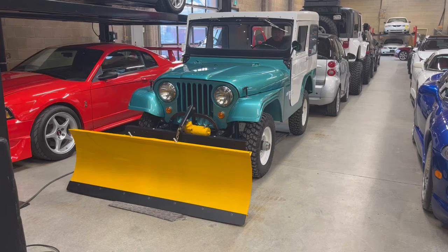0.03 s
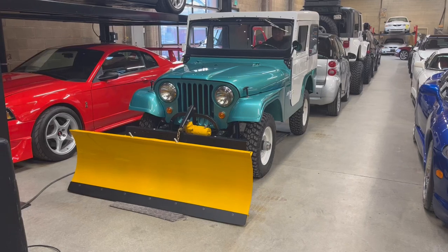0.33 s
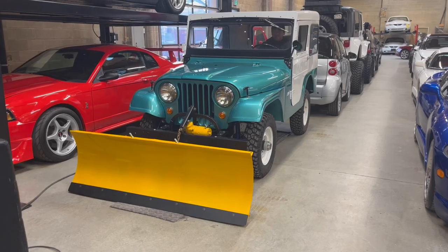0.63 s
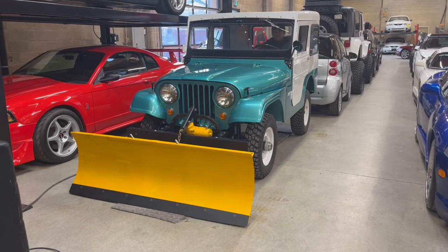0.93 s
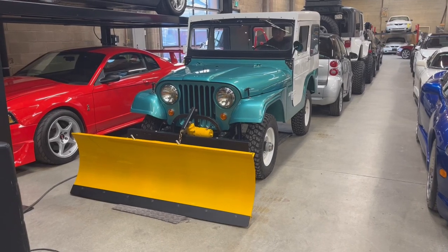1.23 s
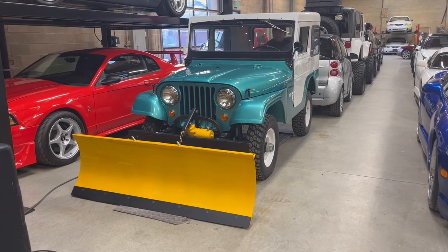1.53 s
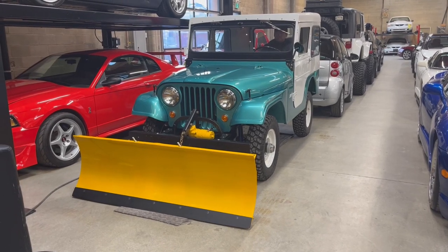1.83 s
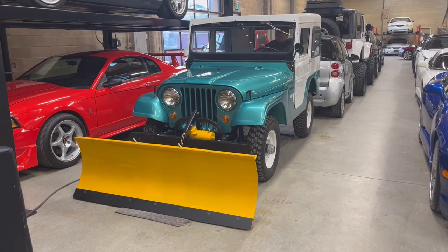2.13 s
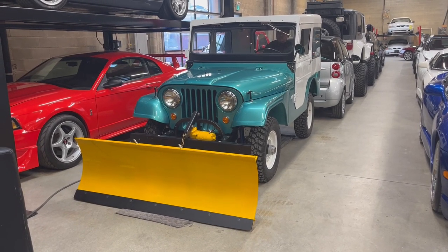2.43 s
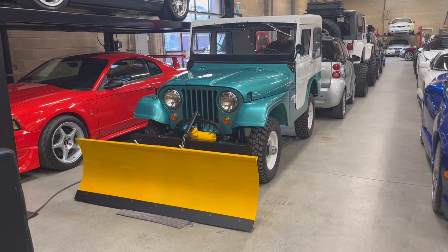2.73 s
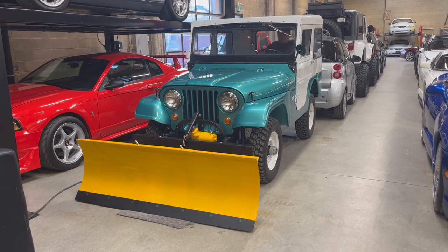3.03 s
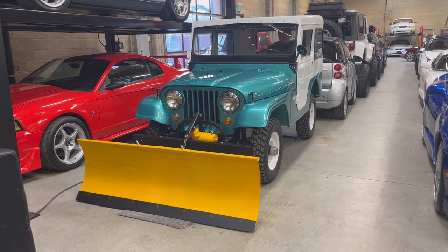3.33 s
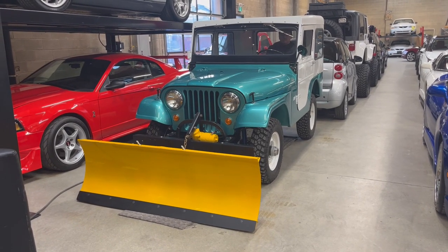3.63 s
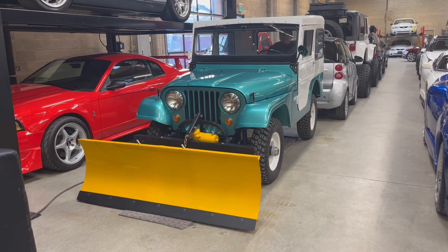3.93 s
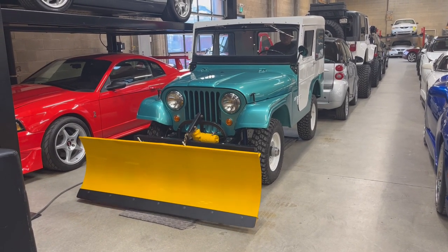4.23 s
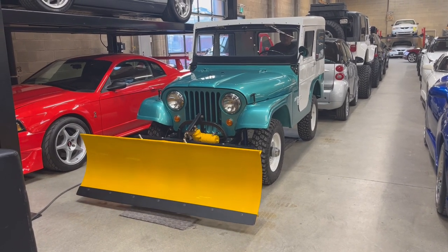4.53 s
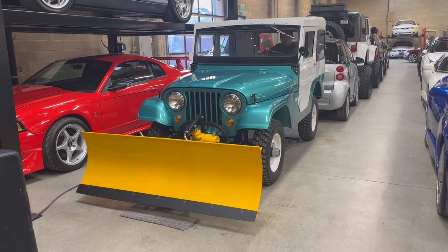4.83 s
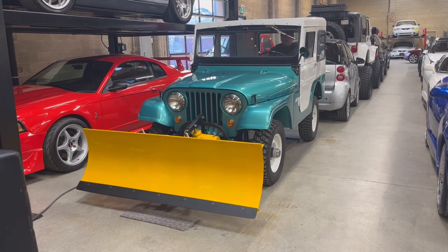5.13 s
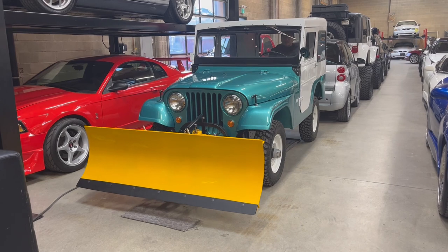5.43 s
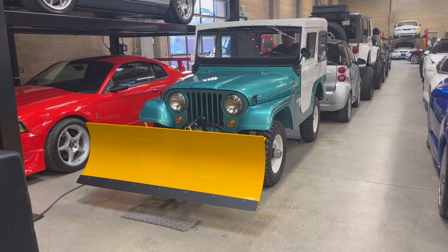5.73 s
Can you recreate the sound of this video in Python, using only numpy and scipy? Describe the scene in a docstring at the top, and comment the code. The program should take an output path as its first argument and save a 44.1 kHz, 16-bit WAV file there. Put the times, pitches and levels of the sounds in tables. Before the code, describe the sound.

A starter grinds and an engine settles to a lumpy idle; after a clack, an electric pump whirs, groans and clinks, raising a plow.

```python
"""A large garage hall, with a phone's two microphone ports a few metres from an old off-roader.
After a few soft knocks a solenoid clacks, the starter grinds on the flywheel and the four-cylinder
engine catches. Its uneven firings ring the exhaust pipe as it settles to a lumpy idle.
A second clack starts the electric hydraulic pump, which whirs and slowly sags as it lifts the snow
plow blade: oil churns, the motor brushes hiss and squeal, the lift groans and ticks, its chain clinks."""
import sys
import numpy as np
from scipy import signal
from scipy.fft import rfft, irfft
from scipy.io import wavfile
from scipy.ndimage import uniform_filter1d

SR = 44100
rng = np.random.default_rng(int(sys.argv[2]) if len(sys.argv) > 2 else 0)


def file_out(sig):
    """Save sig as 16-bit WAV at sys.argv[1]."""
    # one column per channel
    cols = np.atleast_2d(sig).T
    # limit, then scale
    lim = np.clip(cols, -1, 1)
    pcm = np.round(lim * 32767).astype(np.int16)
    wavfile.write(sys.argv[1], SR, pcm)


N = 264600
T = np.arange(N) / SR
HZ = np.fft.rfftfreq(N, 1 / SR)
QUADRATURE = np.array([[0], [np.pi / 2]])  # direct and diffuse rows, a quarter cycle apart


def amp(db):
    """Decibels as a gain."""
    return 10 ** (np.asarray(db) / 20)


def unit_rms(x):
    """Scales to an rms of 1."""
    return x / np.sqrt(np.mean(x ** 2) + 1e-20)


def curve(rows):
    """Follows rows of (t/s, value) through time."""
    return np.interp(T, *np.transpose(rows))


def at_hz(rows, hz):
    """Reads rows of (f/Hz, value) along a log frequency axis."""
    f, value = np.transpose(rows)
    return np.interp(np.log(hz + 1), np.log(f + 1), value)


def rise(start, length):
    """Goes from 0 to 1 in a straight line."""
    return np.clip((T - start) / length, 0, 1)


def settle(start, length):
    """Stays at 1 until start, then dies away."""
    return np.exp(-np.maximum(T - start, 0) / length)


def held(start, attack, end, t60):
    """Attack, hold and release."""
    return rise(start, attack) * amp(-60 * np.maximum(T - end, 0) / t60)


def noise():
    """White noise in two rows, direct and diffuse."""
    return rng.standard_normal((2, N))


def wander(rate):
    """A smooth random drift of rms 1 through rate values a second."""
    knots = rng.standard_normal(4096)
    return np.interp(T * rate * 8, np.arange(32768), signal.resample(knots, 32768))


def coloured(x, colour):
    """Filters by a spectrum; white noise keeps its power."""
    return irfft(rfft(x) * unit_rms(amp(at_hz(colour, HZ))), N)


def panels(x, ripple_db, spacing_hz):
    """Many close resonances of sheet metal and casings ripple the spectrum."""
    ripple = np.interp(HZ / spacing_hz, np.arange(2048), rng.standard_normal(2048))
    return irfft(rfft(x) * unit_rms(amp(ripple_db * ripple * np.clip(HZ / 2000, 0, 1))), N)


def hits(rows, colour):
    """Short, dense rings of struck parts, from rows of (t/s, level/dB, t60/s)."""
    envelope = sum(amp(db - 60 * np.maximum(T - s, 0) / t60) * (T >= s) for s, db, t60 in rows)
    return coloured(noise() * envelope, colour)


# Spectrum of the hall's rumble: f/Hz, level/dB
ROOM_COLOUR = [(15, -20), (30, -32), (55, 7), (120, -4.5), (200, -9.5), (400, -19.5), (800, -25),
               (1600, -27), (3000, -40.5), (6000, -53), (12000, -73)]
def room_tone(db):
    """The low rumble of the hall, all around the microphone."""
    return amp(db) * coloured(noise(), ROOM_COLOUR)


# Knocks at the controls: t/s, level/dB
KNOCKS = [(0.333, -47.5), (0.423, -45), (0.465, -42)]
# Their spectrum: f/Hz, level/dB
KNOCK_COLOUR = [(60, -6), (200, 7), (500, -3), (1500, -15), (2500, -30), (5000, -32), (12000, -55)]
def control_knocks(t60=0.07):
    """Soft, dull knocks as the controls are handled."""
    return hits([(s, db, t60) for s, db in KNOCKS], KNOCK_COLOUR)


# Clacks of the starter's solenoid, then the pump's: t/s, level/dB, t60/s
CLACKS = [(0.585, -45, 0.65), (3.81, -19, 0.13)]
# Their spectrum: f/Hz, level/dB
CLACK_COLOUR = [(200, 18.5), (900, 11), (2000, 15), (4000, 6.5), (5300, 6), (6150, 5), (7000, 7.5),
                (11000, 4.5), (15000, -4)]
def solenoids():
    """Each solenoid snaps shut with a bright clack."""
    return hits(CLACKS, CLACK_COLOUR)


# Spectrum of the grinding pinion: f/Hz, level/dB
GRIND_COLOUR = [(20, -12), (55, 3), (120, -0.5), (300, -8.5), (550, 0), (1300, -5.5), (2500, -14),
                (4000, -18), (6000, -31), (10000, -44), (14000, -54)]
# Rasps of the pinion: start t/s, attack/s, end t/s, t60/s, level/dB
RASPS = [(0.61, 0.013, 0.633, 0.15, -36), (0.744, 0.039, 0.8, 0.68, -33.5)]
# Their spectrum: f/Hz, level/dB
RASP_COLOUR = [(300, -27), (1400, 6), (1950, -4), (2350, 0), (2600, 3), (2950, -8), (3300, 2), (3900, -0.5),
               (4450, -6.5), (6000, -13), (10000, -17), (14000, -23)]
def starter(teeth_per_s=280, tooth_db=9, grain_db=1.5):
    """The pinion grinds tooth by tooth on the flywheel, rasping as it meshes and as it is overrun."""
    grinding = amp(-30.5) * held(start=0.6064, attack=0.028, end=0.855, t60=0.41)
    rasping = sum(amp(db) * held(*shape) for *shape, db in RASPS)
    teeth = unit_rms(amp(-tooth_db * (teeth_per_s * T % 1) + grain_db * wander(rate=150)))
    grind = grinding * coloured(noise() * teeth, GRIND_COLOUR)
    return grind + rasping * coloured(noise() * teeth, RASP_COLOUR)


# Thuds of cranking: t/s, level/dB
THUDS = [(0.643, -27), (0.674, -28), (0.852, -36)]
# Their spectrum: f/Hz, level/dB
THUD_COLOUR = [(30, -12), (70, 1), (140, 2), (300, -16), (800, -40), (4000, -80)]
def cranking_thuds(t60=0.14):
    """The engine thuds as the starter turns it over."""
    return hits([(s, db, t60) for s, db in THUDS], THUD_COLOUR)


def whine(start, length, first_hz, last_hz, db, waver):
    """An unsteady tone that glides up as it swells and fades."""
    along = rise(start, length)
    hz = (first_hz + (last_hz - first_hz) * along) * (1 + waver * wander(rate=120))
    return amp(db) * np.sin(np.pi * along) * np.sin(2 * np.pi * np.cumsum(hz) / SR + QUADRATURE)


# Whines of the start: t/s, length/s, first f/Hz, last f/Hz, level/dB, waver/fraction of pitch
START_WHINES = [(0.694, 0.093, 538, 611, -28.5, .016), (0.744, 0.089, 800, 864, -33, 0.05),
                (0.75, 0.15, 2500, 2746, -36, .028), (0.911, 0.21, 1820, 1955, -41, 0.02)]
def start_whines():
    """The cranking gears, the overrun pinion and the belt whine briefly."""
    return sum(whine(*row) for row in START_WHINES)


CATCH_S, CATCH_RISE_S = 0.862, 0.049  # the engine catches
# Spectrum of fan rush and valve gear: f/Hz, level/dB
CLATTER_COLOUR = [(100, -2), (250, -1.5), (330, -6), (420, -6.5), (500, -3), (700, -5.5), (950, -10),
                  (1350, -6.5), (1680, -11.5), (2150, -15.5), (2550, -13.5), (3000, -17.5), (3400, -16.5),
                  (3900, -18.5), (4350, -18.5), (4800, -19), (5400, -20), (5900, -24), (6600, -19),
                  (7500, -23), (10000, -24.5), (13500, -36.5)]
# Swells of the engine's treble: t/s, level/dB
IDLE_TREBLE = [(0.9, 1), (1.05, 2.5), (1.17, 0), (1.3, 1.5), (1.45, -1.5), (2.0, -0.5), (2.25, 0.5),
               (2.72, -0.8), (2.83, 3), (3.03, -0.5), (3.15, 1.5), (3.35, 0.5), (3.62, -0.7), (3.7, 2.5),
               (3.8, 0)]
def clatter(firings, tap_depth=0.19, treble_hz=3040):
    """Fan rush with a tap of the valve gear for each firing; its treble swells now and then."""
    taps = unit_rms(1 + tap_depth * np.exp(-(firings % 1) / 0.064))
    rush = panels(coloured(noise() * taps, CLATTER_COLOUR), ripple_db=3, spacing_hz=29.6)
    treble = irfft(rfft(rush) / (1 + (treble_hz / (HZ + 1)) ** 8), N)
    db = -34.5 + 3 * settle(CATCH_S, 0.33) + 0.93 * wander(rate=25)
    return rise(CATCH_S, CATCH_RISE_S) * amp(db) * (rush + treble * (amp(curve(IDLE_TREBLE)) - 1))


# Bands of belt and bearings: f/Hz, width/Hz, level/dB
WHIRR_BANDS = [(1930, 93, -56.5), (3730, 90, -54.5), (3946, 170, -54.5), (4760, 99, -60.5),
               (5010, 130, -59), (5600, 60, -61), (6070, 180, -57.5)]
def whirr(swell_db=0.5):
    """Belt and bearings sing in narrow bands of noise that swell with the engine's treble."""
    bands = np.zeros((2, N))
    for hz, width, db in WHIRR_BANDS:
        gain = amp(db + swell_db * wander(rate=6.28))
        resonance = 1 / (1 + (2 * (HZ - hz) / width) ** 2)
        bands += gain * unit_rms(irfft(rfft(noise()) * resonance, N))
    return rise(CATCH_S, CATCH_RISE_S) * amp(curve(IDLE_TREBLE)) * bands


# Strength of the four firings in a cycle: level/dB
CYLINDER_DB = [4, -4.5, 0.5, -6]
# Resonances of exhaust pipe, body and hall: f/Hz, width/Hz, level/dB
PIPE_MODES = [(42.7, 2, -4.5), (52.7, 6.7, 9), (59.7, 4.1, 6), (76.1, 6.8, -0.5), (100.9, 9.6, 0.5),
              (119.64, 11.9, -3.5), (149.8, 28, -17.5), (193.7, 16.6, -11.5), (269.6, 19, -24.5)]
def exhaust(firings, flare, uneven_db=4, gas_rush=0.025):
    """Each firing, strong or weak by cylinder and chance, rings the low modes; gas rushes between."""
    fired = np.flatnonzero(np.diff(np.floor(firings)))
    chance = rng.standard_normal(400)[:len(fired)]
    pulses = gas_rush * rng.standard_normal(N)
    pulses[fired] += amp(np.resize(CYLINDER_DB, len(fired)) + uneven_db * chance)
    t = T[:SR]
    ring = sum(amp(db) * width ** 2 * t * np.exp(-np.pi * width * t) * np.cos(2 * np.pi * hz * t)
               for hz, width, db in PIPE_MODES)
    boom = signal.fftconvolve(pulses, ring)[:N]
    running_rms = np.sqrt(abs(uniform_filter1d(boom ** 2, SR // 4)) + 1e-9)
    return amp(-25.5 + 2 * flare) * boom / running_rms


# Orders of the engine block: multiple of the firing rate, relative level/dB
BLOCK_ORDERS = [(1.25, -34), (3, -41), (5, -48)]
def block_hum(firings, flare, uneven_db=3):
    """The block hums unevenly, swelling as the engine takes hold."""
    orders = sum(amp(db + uneven_db * wander(rate=10)) * np.cos(2 * np.pi * k * firings)
                 for k, db in BLOCK_ORDERS)
    return np.sqrt(2) * amp(-2.5 + 10.5 * flare) * orders


def fan(firings, blades_per_firing=2.37):
    """The passing blades of the belt-driven fan make one low tone."""
    return np.sqrt(2) * amp(-38.5) * np.sin(2 * np.pi * blades_per_firing * firings)


# Idle speed: t/s, firing rate/Hz
IDLE_SPEED = [(1.15, 37.5), (1.28, 39.5), (1.7, 38.0), (1.9, 38.7), (2.28, 38.2), (2.42, 39.2),
              (2.58, 39.1), (2.85, 40.8), (2.99, 40.0), (3.14, 41.1), (3.33, 40.2), (3.8, 40.7)]
def engine(crank_hz=17):
    """Runs up from cranking speed to idle and fills the hall with rumble."""
    firing_hz = crank_hz + (curve(IDLE_SPEED) - crank_hz) * rise(0.72, 0.4)
    firings = np.cumsum(firing_hz) / SR
    flare = np.exp(-((T - 1.07) / 0.14) ** 2)  # one brief swell as it takes hold
    low_end = block_hum(firings, flare) + fan(firings) + room_tone(db=-36.5) + exhaust(firings, flare)
    return rise(0.88, 0.076) * low_end + clatter(firings) + whirr()


PUMP_ON_S, BITE_S, LIFT_LENGTH_S = 3.81, 3.868, 0.45  # motor on; oil taken up; the blade's travel
# Strong shaft orders: multiple (rounded), blade-down level/dB, blade-up level/dB, change begins t/s
PUMP_ORDERS = [(1, -40, -30, 4.75), (2, -33, -39, 6.2), (4, -29.5, -31.5, 4.56), (5, -25, -35.5, 4.37),
               (6, -48, -38.5, 4.4), (7, -30.5, -30.5, 4.3), (8, -29.5, -33, 5), (9, -36, -40.5, 4.1),
               (10, -44.5, -33.5, 4.44), (11, -44, -39, 4.1), (12, -29.5, -40.5, 4.87),
               (13, -31, -34.5, 4.37), (15, -26.5, -43, 5), (16, -37, -28.5, 4.78), (17, -35.5, -62, 4.83),
               (18, -27, -28, 4.9), (19, -34, -37, 4.2), (20, -31, -26, 4.1), (21, -32.5, -28, 6),
               (23, -33.5, -45, 4.65), (24, -27, -45, 4.07), (25, -33, -42, 4.64), (27, -32, -38, 4.4),
               (28, -35, -32, 4.8), (29, -27.5, -42, 4.86), (30, -38, -41, 4.8), (31, -28, -31.5, 5.1),
               (32, -33, -52, 5.4), (35, -55, -34.5, 4.7), (36, -42, -32.5, 5.3), (37, -34.5, -29, 4.8),
               (38, -41, -32, 5.8), (43, -40.5, -37.5, 4.7), (54, -67, -40, 5), (55, -54, -55, 5.2),
               (84.3, -49, -44, 4.9)]
# The weaker orders between and above them: f/Hz, level/dB
FINE_ORDERS = [(40, -57), (200, -51), (600, -42), (1100, -52), (1500, -37), (1800, -52.5), (2200, -50.5),
               (2800, -54.5), (3300, -51), (3700, -77)]
# Cut or boost as the risen blade screens the pump from the microphone: f/Hz, level/dB
BLADE_SCREEN = [(300, -1.5), (480, -3.5), (800, -6), (900, 6), (1250, -1.5), (2200, -2), (3300, 2.5)]
# The pump's three-a-turn drone: t/s, level/dB
DRONE = [(3.95, -29), (4.42, -24.5), (4.92, -20.5), (5.15, -45), (5.55, -58), (5.66, -28), (6.0, -21)]
def pump_tones(turns, shaft_hz, throb_hz=627):
    """Shaft orders of motor and gear pump over a drone, shaded or reflected by the rising blade."""
    strong = {round(k): row for k, *row in PUMP_ORDERS}
    ragged = 0.76 * settle(BITE_S, 0.33)  # the tones steady as the oil flow settles
    screened = rise(5.61, 0.29)
    orders = np.zeros((2, N))
    for k in range(1, 90):
        hz = k * shaft_hz
        if k in strong:
            down_db, up_db, start = strong[k]
            db = down_db + (up_db - down_db) * rise(start, LIFT_LENGTH_S) + 1.1 * wander(rate=6)
        else:
            db = at_hz(FINE_ORDERS, hz) + 2.5 * wander(rate=4)
        jitter = (0.12 + ragged * min(hz / 1000, 1)) * wander(rate=35)
        scatter = min(hz / throb_hz, 1) * (rng.random() - 0.5)  # low orders keep step: a throb a turn
        angle = 2 * np.pi * (k * turns + scatter) + jitter
        gain = amp(db + screened * at_hz(BLADE_SCREEN, hz))
        orders[0] -= gain * np.cos(angle)
        orders[1] += gain * np.sin(angle) * rng.choice([-1, 1])  # by way of the hall, out of step
    drone = amp(curve(DRONE)) * np.sin(2 * np.pi * 3 * turns)
    return np.sqrt(2) * amp(-1) * (orders + drone)


# Resonances of the motor brushes: f/Hz, relative level/dB
SQUEAL_MODES = [(13200, -51.5), (14053, -47), (14468, -55), (14658, -64)]
def brush_squeal(height, waver_hz=35, fitful_db=5, flutter_db=3):
    """The brushes sing in fits, now at one high resonance, now at another, less with the blade up."""
    squeal = np.zeros((2, N))
    for hz, db in SQUEAL_MODES:
        angle = 2 * np.pi * np.cumsum(hz + waver_hz * wander(rate=600)) / SR
        fits = unit_rms(amp(fitful_db * np.minimum(wander(rate=16), 1) + flutter_db * wander(rate=70)))
        diffuse = np.cos(angle) * unit_rms(np.tanh(wander(rate=11)))
        squeal += np.sqrt(2) * amp(db) * fits * np.array([np.sin(angle), diffuse])
    return squeal * amp(7 - 4.6 * height)


# Spectrum of the churning oil: f/Hz, level/dB
CHURN_COLOUR = [(60, 5), (175, 2), (280, 1.5), (420, -7), (510, -4.5), (620, 1), (780, 4.5), (950, -0.5),
                (1150, -1.5), (1500, -1.5), (2000, -10.5), (4000, -19), (8000, -57)]
def oil_churn(turns, height):
    """Oil churns in the pump, hardest at first, with a slight surge at each turn."""
    surge = unit_rms(1 + 0.057 * np.cos(2 * np.pi * turns))
    db = -27.5 + 6 * settle(BITE_S, 0.76) - 0.5 * height
    return amp(db) * coloured(noise() * surge, CHURN_COLOUR)


# Spectrum of the brushes' hiss: f/Hz, level/dB
HISS_COLOUR = [(800, -1), (2000, 1.5), (2400, 2), (2950, -2), (3300, 2.5), (3550, -2.5), (3850, 2.5),
               (4400, -4), (4900, -1), (5800, -2.5), (6350, -1.5), (7400, -0.5), (8300, -25), (10500, -5.5),
               (13000, -26), (15000, -19)]
# Spectrum of their sparks: f/Hz, level/dB
SPARK_COLOUR = [(3000, -12), (7000, -47), (9500, 9.5), (10700, 0), (12700, -9.5), (15000, -4.5)]
def brush_buzz(turns, height, bars=13, hiss_fall_db=2, spark_fall_db=10):
    """The brushes buzz over the commutator bars, hissing and sparking afresh at each turn."""
    contact = (1 + 0.16 * np.cos(2 * np.pi * bars * turns)) * amp(1.4 * wander(rate=98))
    rubbing = unit_rms(contact * amp(-hiss_fall_db * (turns % 1)))
    sparking = contact * amp(spark_fall_db * (0.5 - turns % 1))
    hiss = panels(coloured(noise() * rubbing, HISS_COLOUR), ripple_db=3.5, spacing_hz=36.13)
    sparks = panels(coloured(noise() * sparking, SPARK_COLOUR), ripple_db=-3.5, spacing_hz=112)
    return amp(-32) * hiss + amp(-40 - 3.5 * height) * sparks


# Ticks of the lift gear taking the load: t/s, click level/dB, ring level/dB
TICKS = [(3.9, -35, -24.5), (4, -26, -28.5), (4.103, -28, -31), (4.238, -28, -30), (4.401, -27, -37),
         (4.487, -45, -41), (4.5, -29, -33), (4.565, -28.5, -34), (4.619, -30, -38), (4.651, -29, -33),
         (4.769, -33, -39), (4.802, -24, -43), (5.056, -28, -39)]
# Modes of the lift gear: f/Hz, level/dB, t60/s
GEAR_MODES = [(2693, -1.5, 0.33), (3365, 2, 0.13), (5560, -4, 0.11), (6110, -3.5, 0.092), (6120, -4, 0.13),
              (6400, -7, 0.08), (6520, -11, .08), (7130, -14, .08)]
def gear_chatter(turns, height, uneven_db=4):
    """The ticks, and loose parts knocking at each turn of the pump, ring the metal of the lift gear."""
    each_turn = np.diff(np.floor(turns), prepend=0)
    knock_db = -42.5 - 4.5 * height + uneven_db * np.clip(rng.standard_normal(N), -2, 1)
    knocks = each_turn * amp(knock_db) * rng.choice([-1, 1], N)
    for s, _, ring_db in TICKS:
        knocks[round(s * SR)] += amp(ring_db)
    t = T[:SR // 4]
    ring = sum(amp(db - 60 * t / t60) * np.sin(2 * np.pi * (hz * t + rng.random()) + QUADRATURE)
               for hz, db, t60 in GEAR_MODES)
    return signal.fftconvolve(knocks[None], ring, axes=1)[:, :N]


# Groans of the lift: t/s, length/s, first f/Hz, last f/Hz, level/dB
GROANS = [(3.884, 0.2, 1058, 1200, -19.5), (4.04, 0.23, 712, 726, -22), (4.187, 0.16, 743, 803, -30),
          (4.695, 0.26, 778, 815, -24)]
def lift_groans():
    """The straining lift groans in short, rough, gliding tones."""
    return sum(whine(*row, waver=0.0202) for row in GROANS)


# Pump speed, gathering and then sagging under load: t/s, shaft rate/Hz
PUMP_SPEED = [(3.88, 36.5), (3.95, 38.7), (4.03, 39.9), (4.15, 40.27), (4.53, 39.95), (5.2, 39.65),
              (5.7, 39.43), (6.0, 39.15)]
def pump(spin_up_s=0.018, free_db=-4.5):
    """The motor spins up freely, bites into the oil and lifts the blade."""
    speed = curve(PUMP_SPEED) * (1 - settle(PUMP_ON_S, spin_up_s)) * (1 + 0.00077 * wander(rate=18))
    turns = np.cumsum(speed) / SR
    effort = rise(PUMP_ON_S, BITE_S - PUMP_ON_S) * amp(free_db * (1 - rise(BITE_S, 0.0084)))
    height = rise(5.03, LIFT_LENGTH_S)  # 0 blade down, 1 blade up
    tones = pump_tones(turns, shaft_hz=PUMP_SPEED[-1][1])
    singing = rise(PUMP_ON_S, 0.18) * (tones + brush_squeal(height) + gear_chatter(turns, height))
    return effort * (singing + lift_groans() + oil_churn(turns, height) + brush_buzz(turns, height))


# Spectrum of a tick's click: f/Hz, level/dB
TICK_COLOUR = [(200, -7), (2000, 9), (4000, -5), (5300, -3), (6150, 13), (7000, 6), (9000, -7), (15000, -2)]
def gear_ticks(t60=0.11):
    """The lift gear clicks sharply as it takes the load."""
    return hits([(s, db, t60) for s, db, _ in TICKS], TICK_COLOUR)


# Links of the lift chain settling under the hanging blade: t/s, level/dB
CLINKS = [(4.925, -32), (5.01, -39), (5.108, -30), (5.178, -37), (5.257, -30.5), (5.358, -30), (5.549, -33)]
# Their spectrum: f/Hz, level/dB
CLINK_COLOUR = [(800, -17), (2000, -8), (3300, -1), (4000, 5), (4700, 3), (5500, 0), (6300, 1), (7500, -14),
                (10500, -8), (15000, -22)]
def chain(grains_per_s=390, scrape=0.5):
    """Each link slips in a short burst of tiny clicks over a scrape."""
    grains = unit_rms((rng.random(N) < grains_per_s / SR) * rng.choice([-1., 1.], (2, N)))
    envelope = sum(amp(db) * held(s, 0.002, s, t60=0.15) for s, db in CLINKS)
    return coloured(envelope * unit_rms(grains + scrape * noise()), CLINK_COLOUR)


def hall(x, t60=0.41, wet_db=-11):
    """The garage walls return a dull tail to the microphone."""
    colour = [(200, -12), (2000, 4), (6000, -2), (14000, -28)]  # f/Hz, level/dB
    tail = coloured(noise(), colour)[:, :SR] * amp(-60 * T[:SR] / t60)
    return x + amp(wet_db) * signal.fftconvolve(x, tail / np.linalg.norm(tail[0]), axes=1)[:, :N]


# The phone's two microphone ports: f/Hz, likeness/0-1, left lead/rad, left minus right level/dB
MIC_PORTS = [(100, 1, 0, -.7), (300, .85, 0, 0), (700, .6, 0, -.3), (1300, .48, 0, -.7),
             (1550, .45, -2.4, 0), (1850, .5, 0, .5), (3000, .65, 1.4, 1.5), (4600, .55, 0, 2.3),
             (6500, .78, -1.4, 1.5), (8300, .99, -3.14, .2), (10000, .88, -4.5, 0), (12000, .97, -6.28, 0),
             (14000, .75, -8.2, 0), (15500, .8, -9.3, 0)]
def microphone(x):
    """The direct row reaches both ports, shifted in phase; the diffuse row only the right one."""
    hz, *columns = np.transpose(MIC_PORTS)
    likeness, lead, balance_db = (np.interp(HZ, hz, column) for column in columns)
    direct, diffuse = rfft(x)
    right = likeness * np.exp(-1j * lead) * direct + np.sqrt(1 - likeness ** 2) * diffuse
    return irfft(np.array([direct * amp(balance_db / 2), right * amp(-balance_db / 2)]), N)


def scene():
    """Room tone, engine and pump from a few metres away, the short sounds echoing in the hall."""
    room = room_tone(db=-47.5)
    short_sounds = control_knocks() + gear_ticks()
    machines = engine() + pump()
    short_sounds += starter() + cranking_thuds() + start_whines() + chain() + solenoids()
    return microphone(room + machines + hall(short_sounds))


# Silence at the start and one brief dropout: from t/s, to t/s
SILENCES = [(0, 0.083), (2.170, 2.192)]
def record(dry, low_cut_hz=36, top_hz=14900):
    """The microphone cuts the deepest bass; the sound is muted twice and loses its highest treble."""
    live = np.prod([(T < start) | (T >= end) for start, end in SILENCES], axis=0)
    gate = uniform_filter1d(live.astype(float), 64)
    thinned = signal.sosfilt(signal.butter(6, low_cut_hz, "high", fs=SR, output="sos"), dry)
    band_limit = signal.firwin(601, top_hz, window=("kaiser", 10), fs=SR)
    return signal.oaconvolve(thinned * gate, band_limit[None], "same")


dry = scene()
out = record(dry)
file_out(out)
```